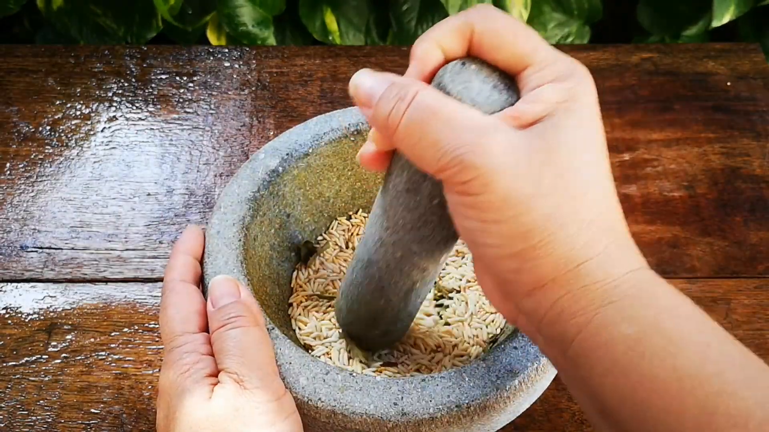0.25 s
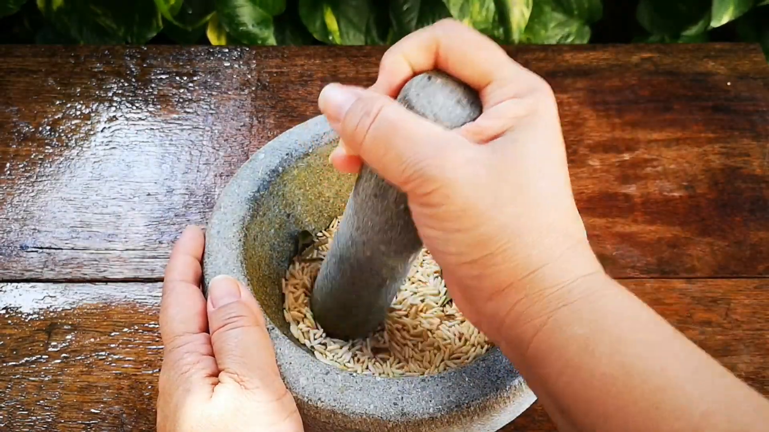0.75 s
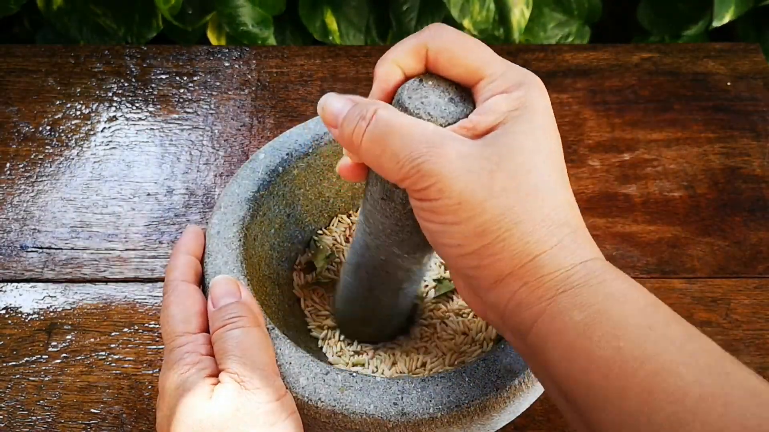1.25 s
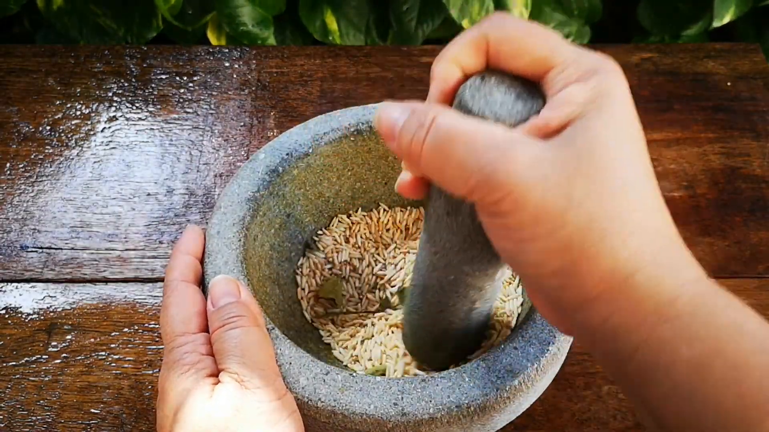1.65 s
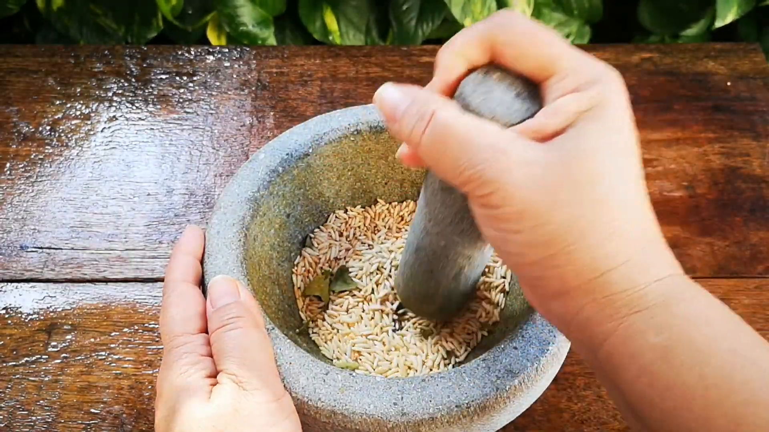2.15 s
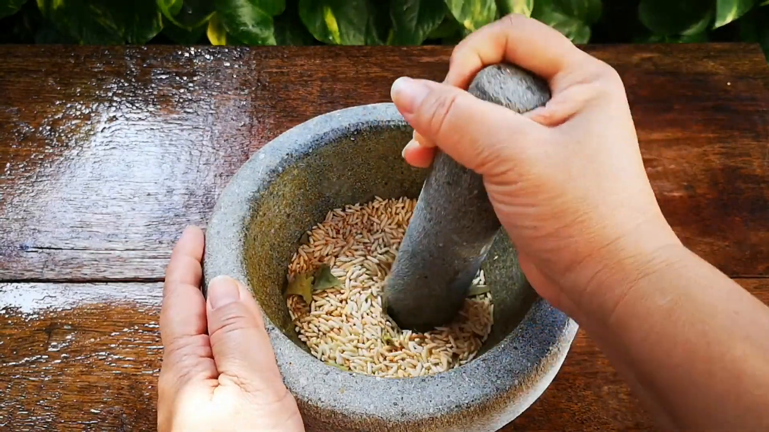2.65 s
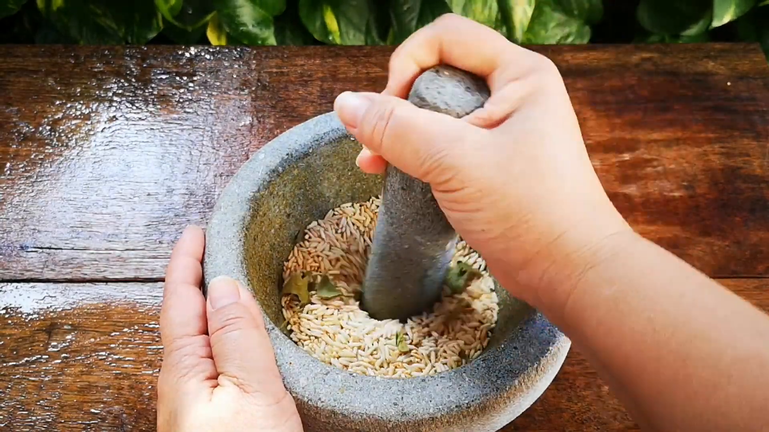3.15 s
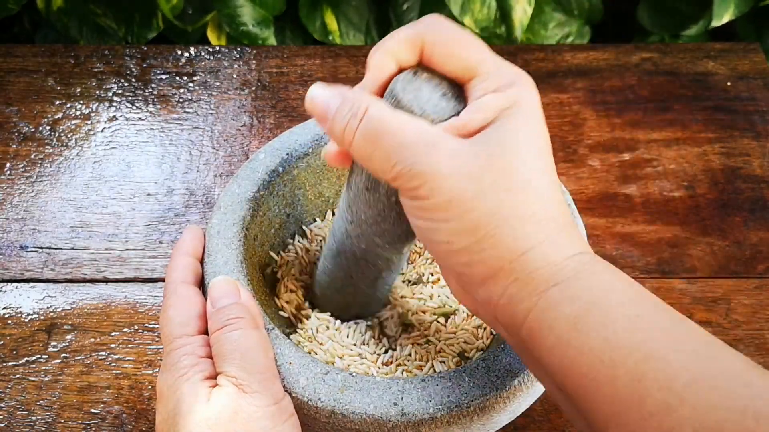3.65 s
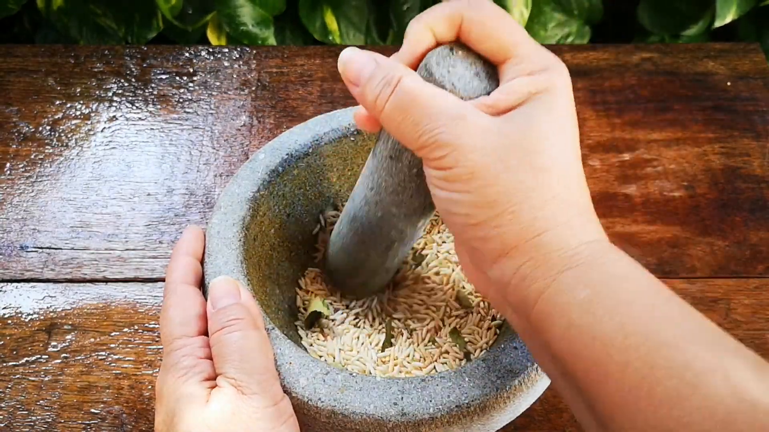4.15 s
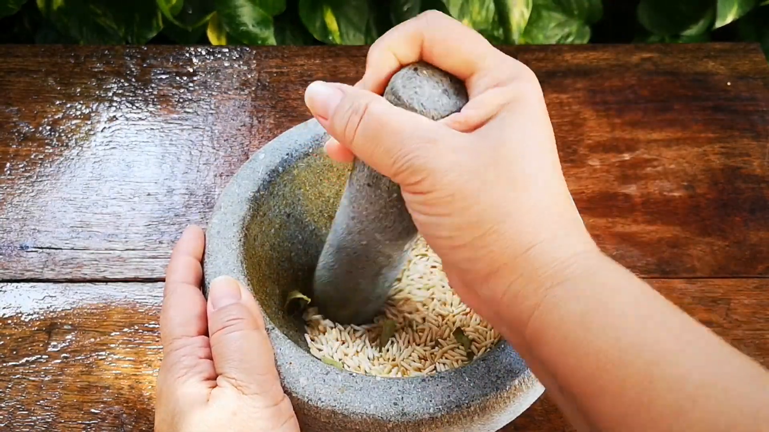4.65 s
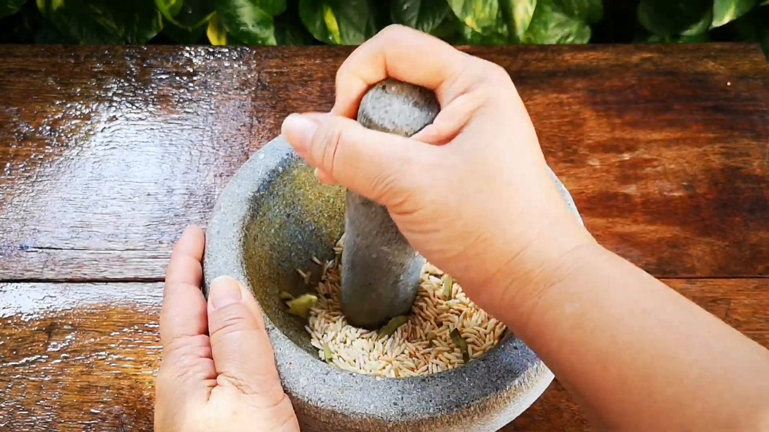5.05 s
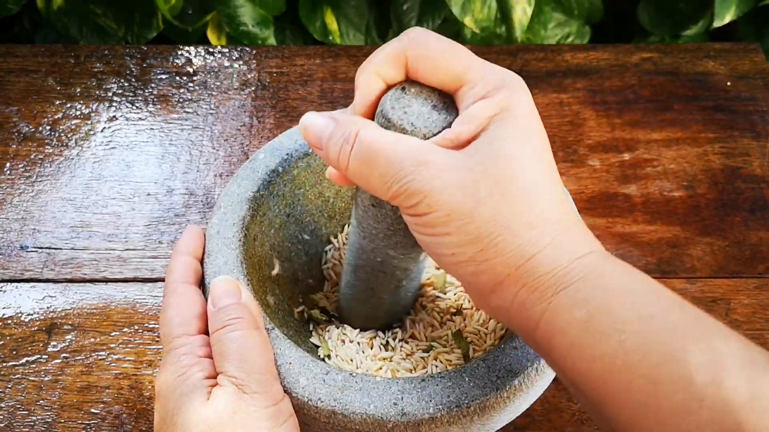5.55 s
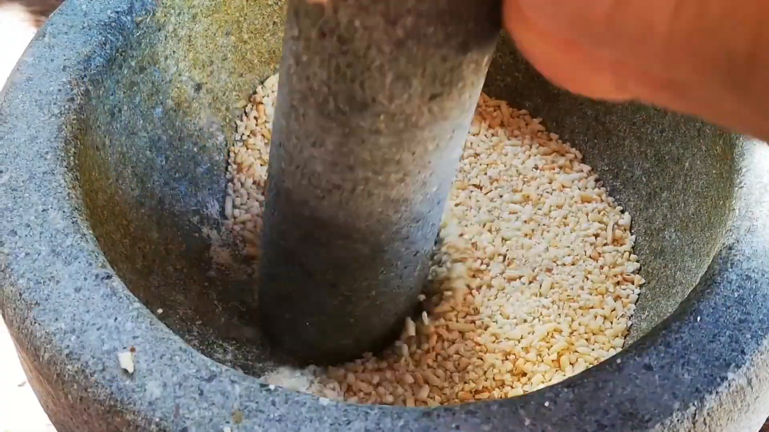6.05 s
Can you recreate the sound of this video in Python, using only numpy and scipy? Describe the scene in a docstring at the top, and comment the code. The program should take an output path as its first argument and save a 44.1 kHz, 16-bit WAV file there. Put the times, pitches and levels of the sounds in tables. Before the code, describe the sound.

Close, gritty grinding of dry rice in a heavy stone mortar, nearly four strokes a second, ending in a few hard, ringing stone knocks.

```python
"""A stone pestle works dry rice in a stone mortar close to the microphones, at nearly four strokes a second.
Each stroke shoves grains aside in ticks and skids, and crushes them in slips that ring bowl and wooden table.
Between and within strokes come knocks on the stone, snapping grains, scrapes, lurches, thumps and rubbing.
Behind lie a low rumble, a flickering wash, faint blips and short noisy chirps; late on a distant motor swells,
its pitch drops, a dry click sounds and the last blows are pounded. Noise and ringing modes make it all."""
import sys
import numpy as np
from scipy import signal
from scipy.fft import rfft, irfft
from scipy.io import wavfile
from scipy.ndimage import uniform_filter1d

SR = 44100
rng = np.random.default_rng(int(sys.argv[2]) if len(sys.argv) > 2 else 0)


def unload_audio(sound):
    """Save the sound as a 16-bit wav file, at the path given as the first command line argument."""
    columns = np.transpose(np.atleast_2d(sound))
    # keep every value between -1 and 1, then stretch to whole-number steps
    steps = np.round(np.clip(columns, -1, 1) * 32767)
    wavfile.write(sys.argv[1], SR, steps.astype(np.int16))


N = 278271
TIME = np.arange(N) / SR
HZ = np.arange(N // 2 + 1) * SR / N

# Levels in the tables are relative; the functions trim them further.
# modes of the mortar on its table: [hz, width_hz, level_db]
MORTAR_MODES = [(141.5, 12.8, -4), (161.8, 16.8, 1), (261, 22.6, -15), (302.3, 20.6, -7), (342, 26, -9),
                (391, 64, -14), (550, 50, -10), (664, 73, -15), (750, 91, -2), (935, 36, -7),
                (1041, 66, -8), (1147, 51, -5.5), (1277, 68, -13.5), (1638, 66, -6), (1878, 82, -14),
                (2020, 113, -1.5), (2925, 31, -14.5), (3012, 65, -6), (2992, 10.7, -25), (3086, 110, -7.5),
                (7050, 65, -12)]
# loose grains shoved aside: [fastest_s, length_s, ticking_db, skidding_db, skid_pitch_hz]
GRAIN_SHOVES = [(0.198, 0.039, -58, -55, 9270), (0.426, 0.04, -59, -53, 10900),
                (0.83, 0.045, -58.5, -59, 8400), (0.918, 0.088, -64.5, -49.5, 10740),
                (1.179, 0.037, -56.5, -58.5, 9500), (1.762, 0.059, -66.5, -58.5, 10900),
                (1.838, 0.042, -65, -59, 10100), (2.028, 0.055, -59.5, -73, 10000),
                (2.124, 0.041, -65.5, -59, 10000), (2.412, 0.046, -63.5, -63, 10000),
                (2.95, 0.03, -57, -72, 10500), (3.2, 0.037, -58, -52, 12200),
                (3.26, 0.041, -58.5, -71, 7000), (3.463, 0.05, -56.5, -56, 12500),
                (3.758, 0.039, -63.5, -58, 11000), (3.827, 0.054, -60, -59, 10800),
                (4.029, 0.086, -60.5, -58, 11150), (4.306, 0.064, -61.5, -64, 10700),
                (4.56, 0.037, -61, -54, 10500), (4.81, 0.03, -64, -64, 10000),
                (5.069, 0.0174, -60.5, -56.5, 10500), (5.307, 0.054, -60.5, -62, 10600),
                (5.872, 0.02, -64, -65, 10130), (6.093, 0.031, -65, -64, 6000)]
# colour of ticking and cracking grains: [hz, level_db]
GRAIN_COLOUR = [(400, 6), (1500, -87), (2500, 15), (4000, 2), (6500, 6), (8000, 5), (9500, 5.5),
                (12000, -6), (15000, -20)]
# level of the pestle rubbing through the rice: [time_s, level_db]
RUBBING_LEVEL = [(0, -59.5), (0.95, -61), (1.5, -63), (3.5, -59.5), (4.4, -59.5), (4.95, -60), (5.3, -57),
                 (5.65, -65.5), (6.31, -65)]
# level of the far wash, which its blips follow: [time_s, level_db]
WASH_LEVEL = [(0, -49.5), (5.4, -51), (5.7, -49.5), (6.31, -51.5)]


def from_db(db):
    """Decibels to gain."""
    return 10 ** (np.asarray(db) / 20)


def rms_one(x):
    """Scale to unit rms."""
    return x / np.sqrt(np.mean(x ** 2) + 1e-20)


def evened(x, window_s=0.067):
    """Hold a grainy sound near unit level while keeping its fine grain."""
    local_power = uniform_filter1d(np.mean(x ** 2, axis=0), int(window_s * SR))
    return x / np.sqrt(local_power + .02 * np.mean(x ** 2))


def in_time(rows):
    """Each column of a curve at every sample."""
    s, *columns = np.transpose(rows)
    return [np.interp(TIME, s, column) for column in columns]


def at_hz(points, hz):
    """Read a spectrum on a log-frequency axis."""
    point_hz, values = np.transpose(points)
    return np.interp(np.log(hz + 1e-3), np.log(point_hz), values)


def colour(x, spectrum):
    """Give a signal a smooth spectrum."""
    return irfft(rfft(x) * from_db(at_hz(spectrum, HZ)), N)


def bandpass(x, low_hz, high_hz, order=2):
    """Keep what lies between two frequencies."""
    return signal.sosfilt(signal.butter(order, [low_hz, high_hz], "band", fs=SR, output="sos"), x)


def band(x, hz, ratio):
    """Keep what lies within a ratio either side of a centre."""
    ratio = max(ratio, 1.05)
    return bandpass(x + 1e-18, hz / ratio, min(hz * ratio, 20000))


def drift(per_s):
    """Random wander along straight lines between normal knots, so many a second."""
    knots = rng.standard_normal(8000)
    return np.interp(TIME * per_s, np.arange(len(knots)), knots)


def ring(force, hz, width_hz):
    """A unit click sets a dying wave of height 1 ringing; a wider resonance dies sooner."""
    r, w = np.exp(-np.pi * width_hz / SR), 2 * np.pi * hz / SR
    return signal.lfilter([1, -r * np.cos(w)], [1, -2 * r * np.cos(w), r * r], force + 1e-18)


def clicks(times, sizes):
    """Single clicks at the given times."""
    out = np.zeros(N)
    samples = np.round(np.asarray(times) * SR).astype(int)
    np.add.at(out, np.clip(samples, 0, N - 1), sizes)
    return out


def random_clicks(per_s, spread_db):
    """Clicks of either sign at random moments, most small and a few large."""
    sizes = from_db(spread_db * np.minimum(rng.exponential(1, N), 4))
    return (rng.random(N) < per_s / SR) * sizes * rng.choice([-1, 1], N)


def bursts(force, decay_s):
    """Each click opens a puff of stereo noise that dies away."""
    envelope = signal.lfilter([1], [1, -np.exp(-1 / (decay_s * SR))], force + 1e-18)
    return envelope * rng.standard_normal((2, N))


def pan(left_db):
    """Channel gains for a left-minus-right level."""
    return from_db(np.array([[.5], [-.5]]) * left_db)


def wide_noise(spectrum):
    """Coloured stereo noise at unit level, alike in the deep bass and unrelated in the treble."""
    # left-right likeness of the air: [hz, likeness_0_to_1]
    likeness = [(50, 0.98), (200, 0.91), (500, 0), (1000, 0.4), (2000, 0), (5000, 0)]
    alike = np.clip(at_hz(likeness, HZ), 0, .99)
    mid, side = rfft(rng.standard_normal((2, N)))
    stereo = np.sqrt(1 + alike) * mid + np.sqrt(1 - alike) * side * [[1], [-1]]
    return rms_one(colour(irfft(stereo, N), spectrum))


def mode_sound(force, hz, width_hz, left_db=3.5, lag_s=.00006):
    """One mode, earlier at the left and leaning further left when higher; left_db is its lean at 1500 Hz."""
    left = ring(force, hz, width_hz)
    # the mode in this range swings the bowl from side to side, so the right hears it opposed
    sign = -1 if 700 < hz < 850 else 1
    right = sign * np.interp(TIME - lag_s, TIME, left)
    return np.array([left, right]) * pan(left_db * min(hz / 1500, 2))


def shifting(x, share, per_s):
    """Resonances slide up and down as the pestle moves round the bowl, by wandering the playing speed."""
    warped = TIME + np.cumsum(share * drift(per_s)) / SR
    return np.array([np.interp(warped, TIME, channel, period=N / SR) for channel in x])


def pressure(start, bear_s, ease_s, fade_s, lead_s=0):
    """Force of one stroke: it bites, grows to its hardest, eases and lets go."""
    start_db, end_db = -6, -13  # against the hardest moment
    hardest, end = start + max(bear_s - lead_s, .002), start + bear_s + ease_s
    touching = np.clip(np.minimum(TIME - start, end - TIME) / fade_s + .5, 0, 1)
    return touching * from_db(np.interp(TIME, [start, hardest, end], [start_db, 0, end_db]))


def crushing(slips_per_s=250, spread_db=2.5, shudder_db=-2, crush_db=-2, dull_db=-6, fade_s=0.014,
             table_top_hz=370, crush_lead_s=0.039):
    """Grains give way under the pestle in uneven slips, which drive the modes of table and bowl."""
    # strokes of the pestle; rocking is against pressing:
    # [start_s, bearing_down_s, easing_off_s, shudder_db, crushing_db, rocking_db]
    strokes = [(0.0, 0.011, 0.039, -41.5, -50, 2), (0.212, 0.006, 0.1, -44, -64, -3),
               (0.439, 0.02, 0.029, -38, -43, 17), (0.646, 0.052, 0.076, -39.5, -50, 3.5),
               (.9, 0.0205, 0.128, -50, -80, -19.5), (1.17, 0.13, 0.018, -41.5, -50, 1),
               (1.4, 0.15, 0.046, -33.5, -48.5, -1.5), (1.748, 0.059, 0.072, -33, -46, 8),
               (2.041, 0.11, 0.034, -34, -48.5, 5.5), (2.41, 0.022, 0.05, -34, -43, 17),
               (2.626, 0.081, 0.068, -42, -52.5, 17), (2.888, 0.074, 0.046, -42.5, -43.5, 22),
               (3.189, 0.0806, 0.052, -41, -48.5, 2), (3.499, 0.024, 0.13, -38.5, -48.5, -1),
               (3.744, 0.095, 0.082, -41.5, -45, -2.5), (4.028, 0.027, 0.085, -38.5, -45, 6.5),
               (4.281, 0.12, 0.032, -39, -47, -4.5), (4.547, 0.018, 0.152, -36, -47, -7),
               (4.802, 0.0069, 0.13, -34, -48, -28), (5.07, 0.023, 0.13, -39.5, -58, -28),
               (5.314, 0.01, 0.09, -36, -51, 0.5), (5.47, 0.19, 0.058, -48, -81, 6),
               (5.857, 0.004, 0.077, -34, -48, 8)]
    shudder, crush = np.zeros((2, N))
    for start, bear_s, ease_s, low_db, high_db, _ in strokes:
        shudder += from_db(low_db) * pressure(start, bear_s, ease_s, fade_s)
        # the grains break a little before the force peaks
        crush += from_db(high_db) * pressure(start, bear_s, ease_s, fade_s, crush_lead_s)
    slips, table, bowl = random_clicks(slips_per_s, spread_db), 0, 0
    rocking = from_db(in_time(strokes)[-1])  # working the far wall rocks the bowl rather than pressing it down
    for hz, width_hz, db in MORTAR_MODES:
        force = slips * from_db(db) * (1 + 1.24 * rng.standard_normal(N))
        if hz < 450:
            table = table + mode_sound(force * (rocking if hz > 270 else 1), hz, width_hz)
        else:  # the bed of rice cushions the higher modes, octave by octave
            cushion = from_db(dull_db * np.log2(hz / 1000))
            bowl = bowl + mode_sound(force * cushion, hz, width_hz)
    table = bandpass(table, 115, table_top_hz, order=4)
    bowl = shifting(bandpass(bowl, 450, 4500), share=.025, per_s=9)
    table_sound = from_db(shudder_db) * shudder * evened(table, window_s=0.0245)
    bowl_sound = from_db(crush_db) * crush * evened(bowl, window_s=0.032)
    return table_sound + bowl_sound


def knocks(thud_trim_db=-8.5, knock_trim_db=-2, clack_trim_db=-2, ring_trim_db=0.0, crack_db=-7,
           contact_db=22, focus_db=8, focus_octaves=0.12, crack_s=.006):
    """The pestle reaches the stone; where it lands sets the pitch and how hard each family of modes is struck."""
    # pestle meeting stone: [time_s, knock_db, thud_db, clack_db, ring_db, crack_db, pitch_hz]
    contacts = [(0.221, -43.5, -28, -48.5, -61, -50, 985), (0.44, -36.5, -35, -34, -43, -46, 970),
                (0.445, -35, -62, -33.5, -41, -51, 1060), (0.6418, -43, -61, -41, -43, -49, 1240),
                (0.702, -41, -59.5, -57, -48, -62, 1280), (0.913, -43.5, -56, -59, -75, -57, 1090),
                (1.178, -38, -29.5, -44, -68, -48, 1010), (1.287, -45, -34.5, -53, -70.5, -51, 1070),
                (1.481, -36, -52.5, -44, -50.5, -63, 1120), (1.506, -42, -23, -42, -60, -52, 1060),
                (1.5147, -39, -25, -35, -44, -51, 1130), (1.531, -40, -27.5, -49, -70, -54, 1070),
                (1.745, -42, -61, -39, -52.5, -50, 1120), (1.785, -50, -49, -42, -43, -54.5, 1120),
                (1.842, -41.5, -38, -51, -61, -58.5, 1080), (1.862, -43, -29.5, -57, -67.5, -62.5, 1110),
                (2.052, -53, -34, -34, -37.5, -48.5, 1050), (2.1, -47, -28, -38, -42, -56, 1030),
                (2.1254, -36.5, -34, -32.5, -35.5, -59.5, 1070), (2.153, -39.5, -44, -53, -47, -55, 990),
                (2.355, -51, -31.5, -39.5, -62, -43.5, 1050), (2.369, -45, -33, -47, -38.5, -63.5, 1060),
                (2.395, -46, -43, -52, -51, -62, 1050), (2.4224, -40, -28, -47, -63, -45, 1000),
                (2.442, -43, -27, -49, -55, -55, 1040), (2.913, -44, -31, -43, -48, -50, 1000),
                (2.954, -46, -26.5, -53, -70.5, -58, 1070), (3.2489, -37, -39, -50, -67.5, -56, 1030),
                (3.759, -43, -39, -54, -46, -54, 1050), (3.776, -51, -53, -50.5, -64, -50, 1070),
                (4.027, -43.5, -47, -39, -52, -43, 885), (4.066, -36, -28, -55, -46, -43.5, 780),
                (4.554, -36.5, -26.5, -38, -41, -47, 970), (4.579, -28.5, -20.5, -50, -58, -41.5, 1050),
                (4.803, -41, -19, -51, -45, -54, 1020), (4.818, -37.5, -26, -42, -45, -61.5, 970),
                (5.317, -60, -29.5, -51, -54, -59, 910), (5.567, -43, -22, -50.5, -37.5, -52, 980),
                (5.595, -37, -34, -50, -48, -47, 760), (5.8602, -33, -17.5, -40, -37, -41.5, 940),
                (6.1194, -19.5, -19, -17.5, -21.5, -67, 1206), (6.133, -56, -45, -38, -28.5, -69, 1290)]
    s, knock, thud, clack, chime, crack, pitch = np.transpose(contacts)
    families = [thud + thud_trim_db, knock + knock_trim_db, clack + clack_trim_db, chime + ring_trim_db, crack]
    # the hard tap of the contact itself
    out = band(clicks(s, from_db(knock + contact_db)), 1400, 1.62) * pan(left_db=-3.0)
    for k, (hz, width_hz, db) in enumerate(MORTAR_MODES):
        family = np.searchsorted([450, 1450, 2500, 4000], hz)
        # a blow favours the bowl's modes near its own pitch
        favoured = focus_db * np.exp(-(np.log2(hz / pitch) / focus_octaves) ** 2)
        uneven = rng.normal(0, 1, len(s))  # dB: no two blows are alike
        force = clicks(s, from_db(families[family] + db + favoured + uneven))
        sign = (-1) ** k if family else 1  # neighbouring modes of the stone swing opposite ways
        # the contact takes about a cycle to build up
        struck = mode_sound(force, hz, width_hz, left_db=5.0)
        out = out + sign * bandpass(struck, hz / 1.25, min(hz * 1.42, 18000))
    cracks = bursts(clicks(s, from_db(crack + crack_db)), crack_s)
    return out + colour(cracks, GRAIN_COLOUR) * pan(left_db=12.5)


def thumps(damping=0.58, level_db=1, soft_hz=260):
    """The heavy bowl bumps its table, which swings for about one cycle."""
    # bumps of the bowl: [time_s, level_db, pitch_hz]
    bumps = [(1.408, -23.5, 123), (1.532, -26, 99.7), (1.765, -26, 110), (2.153, -37.5, 75),
             (2.457, -29, 90), (4.559, -32, 94), (5.102, -27.5, 75), (5.456, -24.5, 90),
             (5.487, -25.5, 65.3), (5.51, -17, 65.7)]
    out = sum(ring(clicks([s], [from_db(db + level_db)]), hz, damping * hz) for s, db, hz in bumps)
    return signal.sosfilt(signal.butter(4, soft_hz, fs=SR, output="sos"), out)


def lurches(level_db=-6, damping=1.2):
    """The pestle lurches through packed rice and shakes the table; the leaning hand damps its modes."""
    # short separate pushes: [time_s, level_db]
    pushes = [(0.686, -39), (0.715, -26), (1.269, -33.5), (1.413, -34), (1.444, -34), (1.769, -34),
              (2.041, -34), (2.069, -35), (2.496, -40), (2.695, -32), (3.268, -31), (3.53, -36)]
    s, db = np.transpose(pushes)
    out = 0
    for hz, width_hz, mode_db in MORTAR_MODES:
        if hz < 450:
            uneven = rng.normal(0, 1.3, len(s))  # dB
            force = clicks(s, from_db(db + mode_db + level_db + uneven))
            out = out + mode_sound(force, hz, width_hz * damping)
    return band(out, 190, 1.4)


def dry_click(time_s=5.629, level_db=-5.5):
    """One short, dry click: a single impulse through a gentle band filter, with no ring."""
    return bandpass(clicks([time_s], [from_db(level_db)]), 150, 1200, order=1)


def shove(s, length, rise_share=0.39, fall_share=0.64):
    """Flow of loose grains: a shove gathers speed and dies away over shares of its length."""
    away = np.maximum((s - TIME) / rise_share, (TIME - s) / fall_share) / length
    return np.exp(-np.minimum(away, 8) ** 2 / 2)


def rice(grains_per_s=4000, grain_s=0.002, level_db=4.0):
    """Loose grains tick against each other and the stone, denser when shoved."""
    # grains trickling between shoves: [time_s, level_db]
    trickle = [(0, -63.5), (1.5, -63.5), (2.6, -65), (3.8, -62.5), (4.9, -66), (5.5, -68.5), (6.1, -66.5),
               (6.15, -72)]
    shoved = sum((from_db(db) * shove(s, length)) ** 2 for s, length, db, _, _ in GRAIN_SHOVES)
    flow = np.sqrt(from_db(in_time(trickle)[0]) ** 2 + shoved)
    rate = grains_per_s * np.sqrt(flow / flow.mean())
    ticks = bursts(np.abs(random_clicks(rate, spread_db=1)), grain_s)
    return from_db(level_db) * flow * evened(colour(ticks, GRAIN_COLOUR)) * pan(left_db=3.5)


def skids(grains_per_s=700, grain_s=0.004, width_ratio=1.22, level_db=5):
    """Shoved grains skid over the stone in a bright crackle, pitched differently at each shove."""
    grains = evened(bursts(np.abs(random_clicks(grains_per_s, spread_db=3)), grain_s))
    out = sum(band(grains * (from_db(db) * shove(s, length)), hz, width_ratio)
              for s, length, _, db, hz in GRAIN_SHOVES)
    return from_db(level_db) * out * pan(left_db=-0.5)


def snaps(decay_s=0.00079, width_ratio=1.45, level_db=0):
    """A single grain breaks with a tiny bright crack of dying noise."""
    # single grains snapping: [time_s, level_db, centre_hz]
    breaks = [(0.201, -33, 9000), (0.903, -32, 10200), (0.9466, -32, 11000), (0.967, -37, 10000),
              (0.992, -37, 8000), (1.177, -36, 9500), (1.741, -36, 11000), (2.142, -35, 9000),
              (2.162, -35.5, 8000), (2.354, -33, 6960), (2.9536, -35, 8000), (3.193, -45, 12500),
              (3.264, -35.5, 6360), (3.4863, -30.5, 7500), (3.8229, -46.5, 9000), (4.325, -39, 8900),
              (4.579, -35, 8000), (5.072, -46, 9000), (5.5676, -32, 10100), (5.5934, -36, 8100),
              (5.629, -38, 8200), (5.861, -37, 9500)]
    out, t = np.zeros((2, N + SR)), TIME[:SR // 20]
    for s, db, hz in breaks:
        start = int(s * SR)
        puff = from_db(db + level_db) * np.exp(-t / decay_s) * rng.standard_normal((2, len(t)))
        out[:, start:start + len(t)] += band(puff, hz, width_ratio)
    return out[:, :N] * pan(left_db=1.5)


def scrapes(decay_s=0.0089, width_ratio=1.1, level_db=1, slips_per_s=900):
    """A grain dragged over the stone chatters briefly in a narrow band of its own."""
    # dragged grains: [time_s, level_db, pitch_hz]
    drags = [(0.01, -46, 1930), (0.322, -52, 1210), (0.52, -44.5, 1900), (0.523, -58, 1290),
             (0.592, -46, 1350), (0.598, -48, 1920), (1.545, -49, 1750), (1.92, -45.5, 1750),
             (2.2, -45, 1900), (2.769, -44, 1000), (2.77, -48, 1900), (3.098, -47, 1850),
             (3.162, -46, 1030), (3.93, -48, 1800), (4.7, -44.5, 1680), (5.667, -47, 1923)]
    out, t = np.zeros((2, N + SR)), TIME[:SR // 10]
    for s, db, hz in drags:
        slips = (rng.random(len(t)) < slips_per_s / SR) * rng.standard_normal((2, len(t)))
        chatter, start = rms_one(band(slips, hz, width_ratio)), int(s * SR)
        out[:, start:start + len(t)] += from_db(db + level_db) * np.exp(-t / decay_s) * chatter
    return out[:, :N] * pan(left_db=2.0)


def rubbing(grains_per_s=350, grain_s=0.0041, unsteady_db=3.5):
    """The pestle keeps rubbing through the rice: small separate crunches of shifting colour."""
    # colour of the crunching: [hz, level_db]
    crunch_colour = [(650, -19), (1000, -26), (1400, 2.5), (1900, 17.5), (2600, -14), (3600, 1), (5500, 8),
                     (8000, -24), (15000, -22)]
    grains = bursts(np.abs(random_clicks(grains_per_s, spread_db=3)), grain_s)
    crunch = shifting(colour(grains, crunch_colour), share=0.13, per_s=14)
    level = from_db(in_time(RUBBING_LEVEL)[0] + unsteady_db * drift(15))
    return level * evened(crunch, window_s=0.23) * pan(left_db=2.0)


def crunches(per_s=15, cycles=11, low_hz=1000, high_hz=3100, count=12, over_rub_db=-3):
    """Grains crack under the rubbing pestle, ringing a few cycles at one of several pitches, per_s at each."""
    out = 0
    for hz in np.geomspace(low_hz, high_hz, num=count):
        cracks = random_clicks(per_s, spread_db=2)
        ringing = mode_sound(cracks, hz, hz / cycles, left_db=2.0, lag_s=.00016)
        out = out + ringing * (1500 / hz) ** .5
    out = bandpass(out, 900, 4000, order=4)
    return from_db(in_time(RUBBING_LEVEL)[0] + over_rub_db) * rms_one(out)


def surroundings(x, tail_db=-12, t60=0.12, late_db=-14, late_t60=0.55):
    """A few close reflections and a dull, diffuse tail that drops fast and then lingers faintly."""
    # nearby surfaces: [delay_s, left_db, right_db]
    echoes = [(.0047, -9.5, -66), (0.0146, -26, -7)]
    t = TIME[:SR // 2]
    decay = from_db(-60 * t / t60) + from_db(late_db - 60 * t / late_t60)
    tail = rng.standard_normal((2, len(t))) * decay * (t > .003)
    response = from_db(tail_db) * tail / np.sqrt(np.sum(tail ** 2) / 2)
    for delay, left_db, right_db in echoes:
        response[:, int(delay * SR)] += from_db([left_db, right_db])
    response = bandpass(response, 350, 7000, order=1)
    return x + signal.fftconvolve(x, response, axes=1)[:, :N]


def swells_db():
    """Brief, smooth rises and lulls of the rumble."""
    # swells against the usual level: [middle_s, length_s, change_db]
    swells = [(0.687, 0.035, -4), (0.89, 0.086, 4), (1.141, 0.0436, -7), (1.28, 0.024, 8),
              (1.57, 0.04, -15), (1.975, 0.11, -11), (2.15, 0.017, 4), (2.255, 0.024, -17),
              (3.032, 0.061, 13), (3.125, 0.045, -17), (3.693, 0.017, 11), (4.267, 0.031, 7),
              (4.69, 0.11, 6), (4.81, 0.036, -10.5), (5.116, .05, 9.5), (5.267, 0.086, -5.5),
              (5.475, 0.058, 6.5), (6.171, 0.028, -37)]
    return sum(db * np.exp(-np.minimum(np.abs(TIME - s) / length, 6) ** 2) for s, length, db in swells)


def open_air(patchy_db=3.0, patches_per_s=22, rumble_db=6.0):
    """Rumble below; above it a far wash of noise whose middle bands flicker on their own."""
    # colour of the wash: [hz, level_db]
    wash_colour = [(100, 13.5), (300, -3.5), (420, -9.5), (540, -4.5), (650, -14.5), (820, -5.5),
                   (1000, -5), (1400, -11.5), (1850, 1), (2500, -8), (3400, -7.5), (5500, -14),
                   (8200, -20.5), (9600, -20.5), (15000, -26.5)]
    # level of the treble hiss within the wash: [time_s, level_db]
    hiss_level = [(0, 0.5), (5.0, 1.5), (5.4, 1), (5.51, -10), (5.6, 6), (5.76, -14), (5.95, -10),
                  (6.11, -1), (6.15, -15), (6.31, -3)]
    # colour of the rumble: [hz, level_db]
    rumble_colour = [(15, -4.5), (28, 2.5), (50, 0), (75, -2), (105, -9.5), (150, -30.5), (300, -31),
                     (600, -85)]
    # level of the rumble: [time_s, level_db]
    rumble_level = [(0.0, -47), (0.6, -47.5), (0.91, -48.5), (1.62, -43), (2.07, -42.5), (2.44, -45.5),
                    (3.22, -52.5), (3.53, -44.5), (3.81, -55), (4.08, -52.5), (4.53, -46), (4.83, -48.5),
                    (5.61, -40), (5.92, -43), (6.03, -43.5), (6.31, -45)]
    wash = from_db(in_time(WASH_LEVEL)[0]) * wide_noise(wash_colour)
    spectrum = rfft(wash)
    for centre in 1000 * 2 ** (np.arange(7) / 4):  # quarter octaves
        weight = np.clip(1 - np.abs(4 * np.log2((HZ + 1) / centre)), 0, 1)
        patch = irfft(spectrum * weight, N)
        wash = wash + patch * (from_db(patchy_db * drift(patches_per_s)) - 1)
    hiss = irfft(spectrum * np.clip((HZ - 4000) / 6000, 0, 1), N)
    wash = wash + hiss * (from_db(in_time(hiss_level)[0]) - 1)
    rumble = from_db(in_time(rumble_level)[0] + rumble_db + swells_db())
    return wash + rumble * evened(wide_noise(rumble_colour), window_s=0.107)


def short_chirps(level_db=4.0, decay_share=0.84, onset_s=.003):
    """Short chirps: narrow bands of noise at middle pitches, each starting quickly and dying away."""
    # chirps: [time_s, level_db, pitch_hz, width_hz, length_s]
    chirps = [(0.225, -60, 3690, 990, 0.099), (0.255, -47, 2490, 250, 0.024),
              (0.369, -47, 1986, 120, 0.032), (0.564, -57, 2146, 610, 0.093),
              (0.827, -50.5, 2370, 400, 0.024), (1.102, -56, 2154, 400, 0.113),
              (1.525, -47.5, 1697, 400, 0.061), (1.65, -43, 2652, 217, 0.041),
              (1.689, -54, 2940, 450, 0.037), (1.735, -52.5, 4030, 450, 0.054),
              (2.026, -45, 2126, 715, 0.058), (2.251, -55, 3510, 700, 0.054),
              (2.259, -46.5, 1354, 251, 0.021), (2.685, -54, 2440, 600, 0.037),
              (2.796, -56, 3860, 1200, 0.1), (3.16, -45, 1830, 604, 0.011),
              (3.383, -55.5, 4130, 950, 0.076), (3.595, -52, 1714, 260, 0.21),
              (3.996, -54, 4290, 700, 0.0396), (4.194, -48.5, 1192, 263, 0.042),
              (4.184, -49.5, 1970, 400, 0.043), (4.442, -47.5, 2950, 700, 0.038),
              (4.487, -41.5, 1883, 120, 0.016), (4.787, -38.5, 1870, 155, 0.0057),
              (5.16, -59, 3370, 710, 0.17), (5.51, -52, 1840, 188, 0.042), (6.063, -57, 3900, 900, 0.099),
              (6.09, -42, 2560, 160, 0.022), (6.186, -58.5, 4090, 300, 0.07),
              (6.277, -58, 1400, 249, 0.051)]
    out, t = np.zeros((2, N + SR)), TIME[:SR // 2]
    for s, db, hz, width_hz, length in chirps:
        # slow noise carried up to the pitch makes a narrow band around it
        lowpass = signal.butter(2, width_hz / 2, fs=SR, output="sos")
        slow = signal.sosfilt(lowpass, rng.standard_normal((2, 2, len(t))))
        phase = 2 * np.pi * hz * t
        narrow = evened(slow[0] * np.cos(phase) + slow[1] * np.sin(phase), window_s=0.11)
        shape, start = np.minimum(t / onset_s, 1) * np.exp(-t / (decay_share * length)), int(s * SR)
        out[:, start:start + len(t)] += from_db(db + level_db) * shape * narrow
    return out[:, :N]


def pips(per_s=12, spread_db=1.5, decay_s=0.017, over_wash_db=-8):
    """A faint, restless patter of short noise blips at scattered middle pitches, per_s at each."""
    out = 0
    for hz in np.geomspace(1000, 2500, num=8):
        puffs = bursts(np.abs(random_clicks(per_s, spread_db)), decay_s)
        out = out + bandpass(puffs, hz - 110, hz + 110)
    return from_db(in_time(WASH_LEVEL)[0] + over_wash_db) * evened(out, window_s=0.47)


def motor(waver=0.0071):
    """A far engine: one wavering sine over a dull drone of noise."""
    # the sine: [time_s, pitch_hz, level_db]
    motor_line = [(0, 301, -75.5), (4.9, 302.8, -64), (5.1, 306.9, -58), (5.55, 308.3, -54),
                  (5.62, 250.3, -48), (5.8, 239.6, -50.5), (6.05, 245.4, -59), (6.31, 241, -64)]
    # level of the drone: [time_s, level_db]
    drone_level = [(0, -65), (5.3, -53), (5.45, -45.5), (5.7, -41.5), (6.0, -40), (6.31, -47.5)]
    # colour of the drone: [hz, level_db]
    drone_colour = [(70, 1.5), (110, 9.5), (170, -2), (250, -2.5), (380, -10.5), (550, -15.5), (1000, -41)]
    hz, db = in_time(motor_line)
    wavering_hz = hz * (1 + waver * drift(24.83))
    line = np.sqrt(2) * np.sin(2 * np.pi * np.cumsum(wavering_hz) / SR)
    return from_db(db) * line + from_db(in_time(drone_level)[0]) * wide_noise(drone_colour)


def scene():
    """The mortar close by, the outdoors behind."""
    blows = knocks() + thumps() + lurches() + dry_click()
    grains = crushing() + rice() + skids() + snaps() + scrapes() + rubbing() + crunches()
    return surroundings(blows + grains) + open_air() + short_chirps() + pips() + motor()


def record(dry, cutoff_hz=15350):
    """The top is cut steeply by an elliptic low-pass."""
    return signal.sosfilt(signal.ellip(10, .3, 70, cutoff_hz, fs=SR, output="sos"), dry)


dry = scene()
out = record(dry)
unload_audio(out)
```